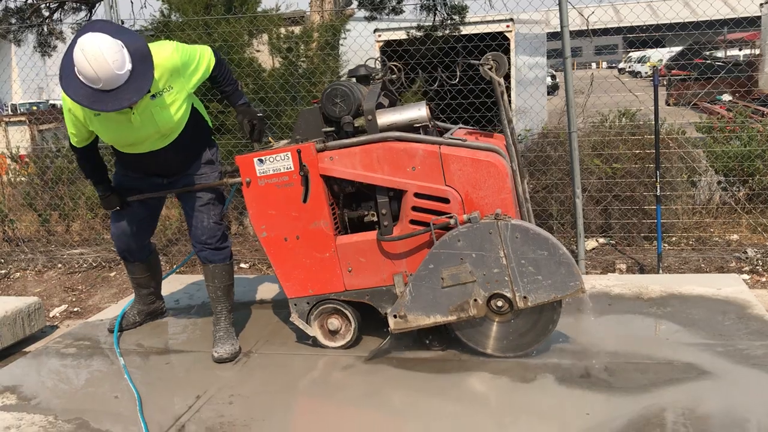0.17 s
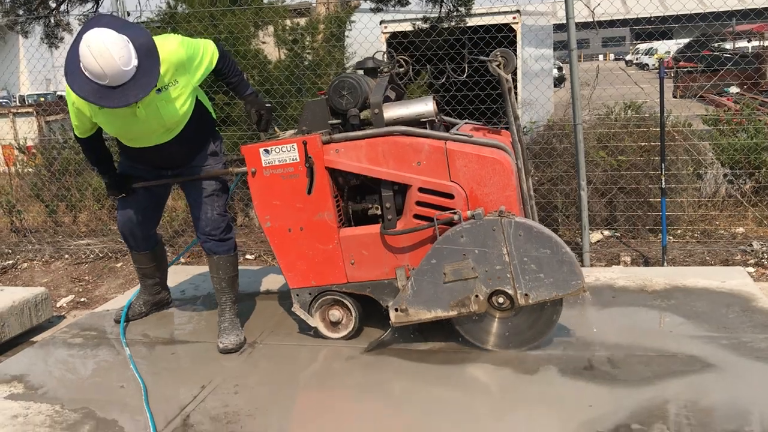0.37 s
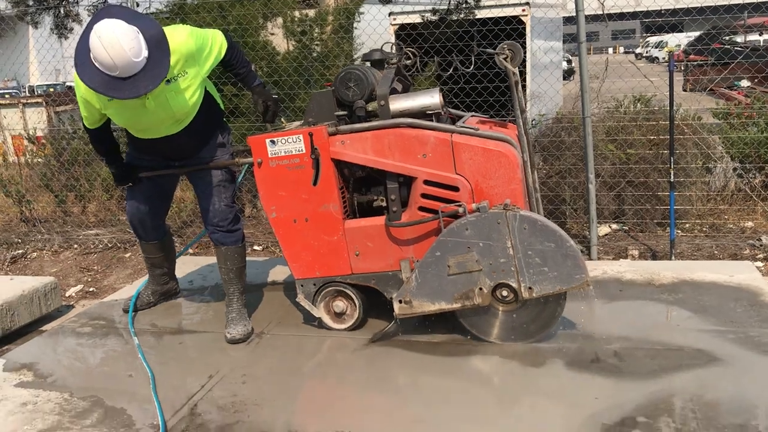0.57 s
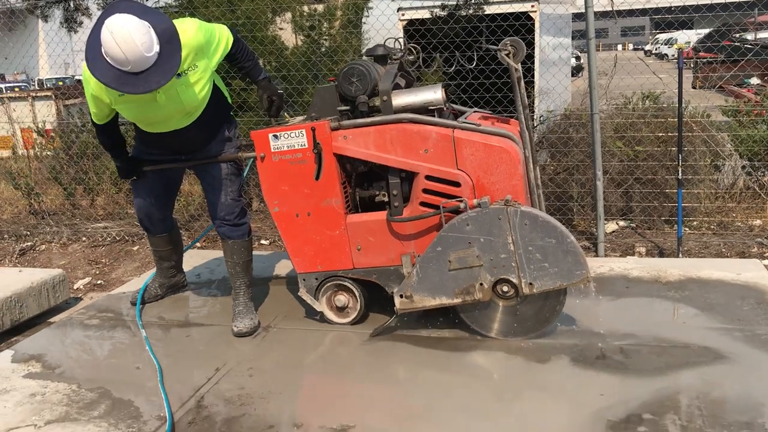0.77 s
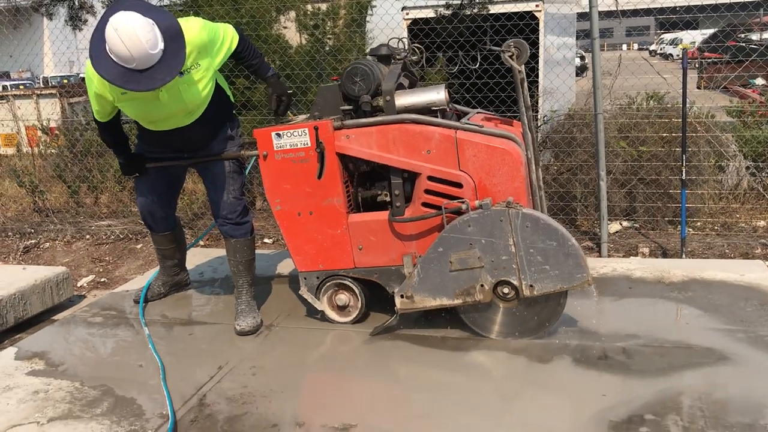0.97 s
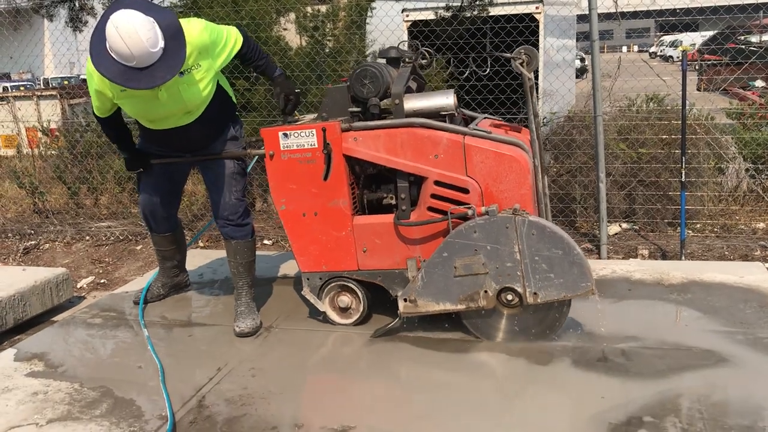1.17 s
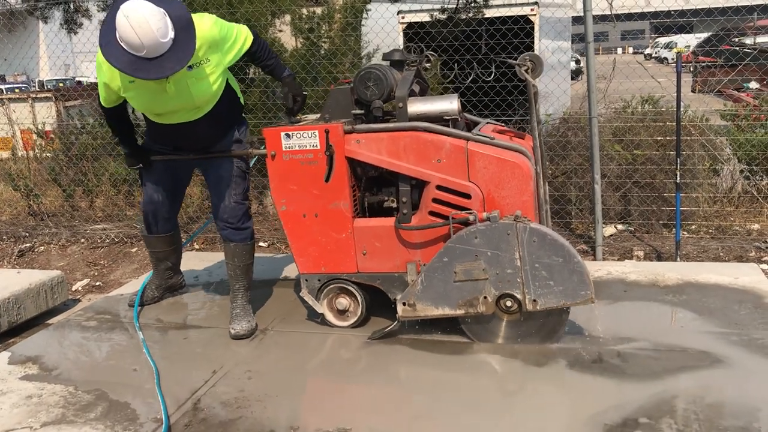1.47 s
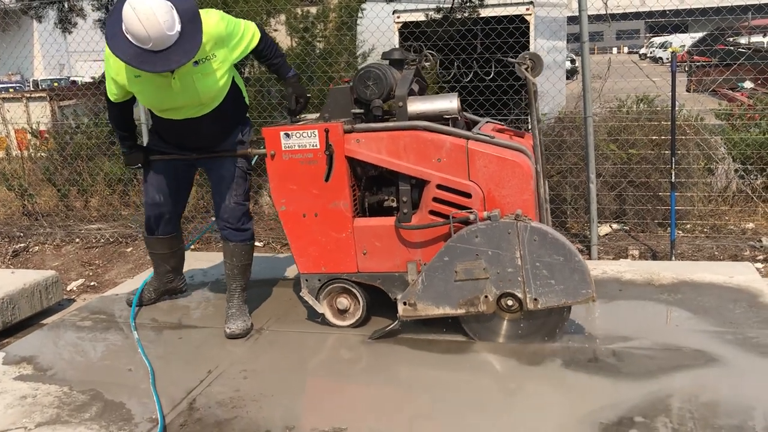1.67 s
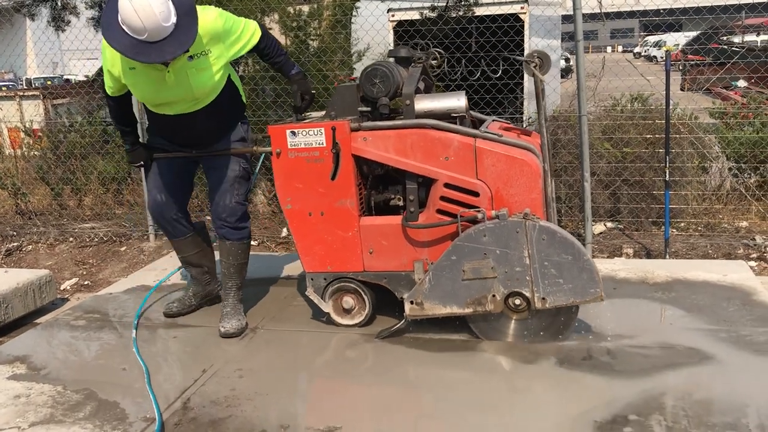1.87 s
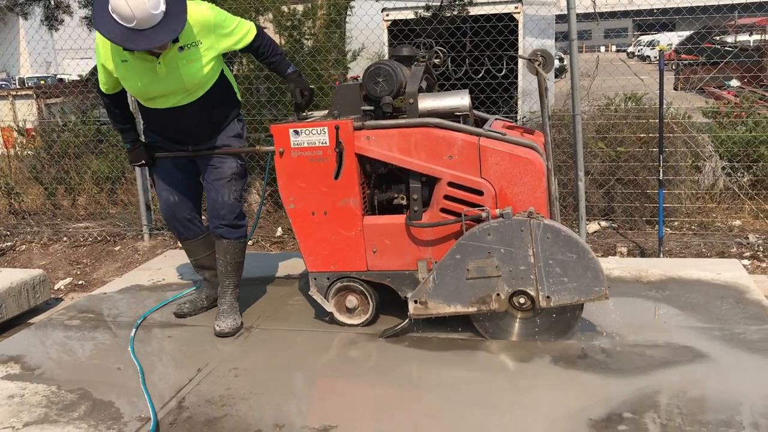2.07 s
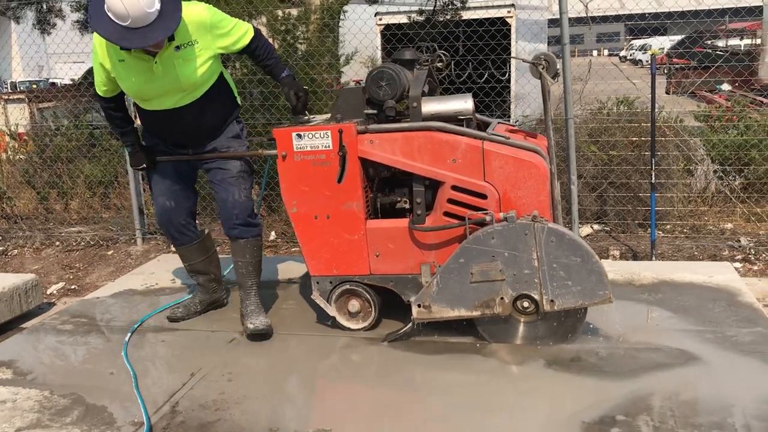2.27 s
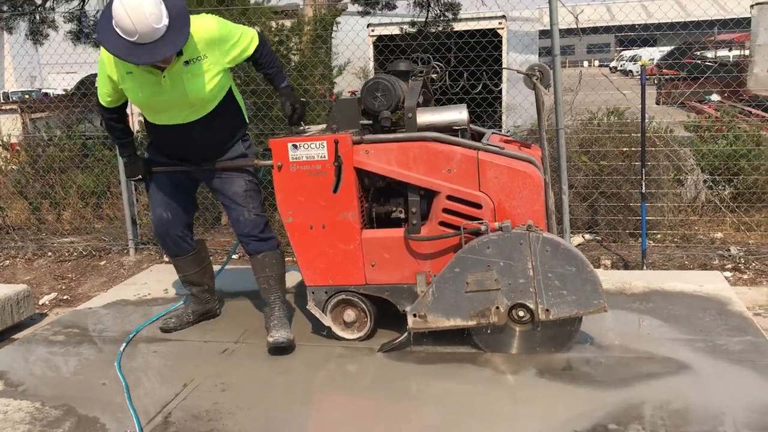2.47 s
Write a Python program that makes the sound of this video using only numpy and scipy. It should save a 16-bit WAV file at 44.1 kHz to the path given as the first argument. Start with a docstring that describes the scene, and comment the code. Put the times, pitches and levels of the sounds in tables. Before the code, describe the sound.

A walk-behind diesel concrete saw drones, then its blade bites into wet concrete with harsh ringing grind.

```python
"""Outdoors, a walk-behind diesel road saw runs at full speed while its blade cuts wet concrete.
The four-cylinder engine is a sum of sines for drone and whines, plus filtered noise for growl and clatter.
After half a second the blade bites: dense random impacts ring the steel disc, rasp and spray slurry,
and three disc modes sing as wavering tones. Hollow swells pass through the hum; the whole slowly sinks."""
import sys
import numpy as np
from scipy import signal
from scipy.fft import rfft, irfft
from scipy.io import wavfile
from scipy.ndimage import uniform_filter1d

SR = 44100
rng = np.random.default_rng(int(sys.argv[2]) if len(sys.argv) > 2 else 0)


def unload_audio(sound):
    """Save the sound as a 16-bit wav file, at the path given as the first command line argument."""
    columns = np.transpose(np.atleast_2d(sound))
    # keep every value between -1 and 1, then stretch to whole-number steps
    steps = np.round(np.clip(columns, -1, 1) * 32767)
    wavfile.write(sys.argv[1], SR, steps.astype(np.int16))


N = 115983

# The blade in the cut. Each row: time in seconds, relative grinding force in dB,
# relative level of the spray hiss in dB.
CUT_COURSE = [(.46, -20.5, -35), (.495, -9, 0), (.52, 0, 0), (.6, 1, 2.5), (.74, 0, -2.5), (.9, 0, 0),
              (1.02, 1, -1), (1.08, 3, 2), (1.15, 4, 6), (1.28, 2.5, 4), (1.35, 4, 4.5), (1.41, 1, 4),
              (1.5, 5.5, 4.5), (1.66, 2, 3), (1.82, 3.5, 3), (2.12, 3.5, 3), (2.24, 0.5, 0), (2.42, 4, 4),
              (2.63, 2.5, 0.5)]


def undb(db):
    """Level to amplitude: 20 dB is a factor of ten."""
    return 10 ** (np.asarray(db) / 20)


def unit(x):
    """Normalisation: scale to an rms value of 1."""
    return x / np.sqrt(np.mean(x ** 2))


def curve(table, axis=1):
    """Linear interpolation in time of one column of a table."""
    rows = np.array(table, float)
    return np.interp(np.arange(N) / SR, rows[:, 0], rows[:, axis])


def walk(rate):
    """Slow random modulation: values held for 1 / rate seconds, smoothed twice, rms 1."""
    hold = int(SR / rate)
    held = np.repeat(rng.standard_normal(N)[:N // hold + 1], hold)
    smoothed = uniform_filter1d(uniform_filter1d(held, hold), hold)
    return unit(smoothed[:N])


def colour(x, points):
    """Spectral shaping: a response through (Hz, dB) points on a log frequency axis, rms 1."""
    hz, db = np.array(points, float).T
    frequency = np.maximum(np.fft.rfftfreq(N, 1 / SR), 1)
    response = undb(np.interp(np.log(frequency), np.log(hz), db))
    return unit(irfft(rfft(x) * response, N))


def ring(x, hz, width):
    """Resonance: one damped mode of the given bandwidth in Hz, driven by x, rms 1."""
    pole = np.exp((2j * np.pi * hz - np.pi * width) / SR)
    return unit(signal.lfilter([1], [1, -pole], x).imag)


def tone(turns):
    """Pure tone: a sine of rms 1 from its phase in turns."""
    return np.sqrt(2) * np.sin(2 * np.pi * turns)


def grains(rate, spread_db):
    """Shot noise: random impacts per second, of either sign and unequal size, rms 1."""
    hit = rng.random(N) < rate / SR
    sign = rng.choice([-1, 1], N)
    size = undb(spread_db * rng.exponential(size=N).clip(0, 5))
    return unit(hit * sign * size)


def blade():
    """Impact excitation: grit strikes the disc's modes, rasps through the ringing guard, flies off as slurry."""
    # Modes of the steel disc. Each row: frequency in Hz, bandwidth in Hz, relative level in dB.
    disc_modes = [(2110, 70, -33), (2580, 45, -30.5), (3085, 40, -33), (3190, 40, -35), (3370, 45, -28.5),
                  (3480, 45, -32), (3715, 45, -29.5), (3830, 35, -29.5), (4100, 50, -33),
                  (4440, 110, -27.5), (4786, 35, -27.5), (5270, 70, -29.5), (5610, 25, -34),
                  (5716, 20, -36), (5992, 28, -28.5), (6285, 30, -34), (6378, 30, -34), (6575, 40, -28),
                  (7000, 25, -38), (8520, 30, -36), (8950, 40, -35), (9280, 70, -36), (10750, 50, -37),
                  (11130, 60, -36), (11630, 50, -35), (14800, 90, -35)]
    # Spectrum of the rasp. Each row: frequency in Hz, relative level in dB per Hz.
    rasp_spectrum = [(500, -31), (1000, -7.5), (1800, -24), (2300, -6), (2850, -10.5), (3150, -2.5),
                     (3800, 1), (4500, .5), (5000, -6), (5400, -2), (5800, -5.5), (6500, -6), (7100, -6),
                     (7500, -9.5), (8200, -15), (16000, -24)]
    # Spectrum of the slurry spray. Each row: frequency in Hz, relative level in dB per Hz.
    spray_spectrum = [(3000, -17), (7000, -18), (8200, -3.5), (8700, -1.5), (9400, 1.5), (10300, 0),
                      (11000, 3), (12500, 0), (14000, 3), (15000, 0.5), (16000, 3.5)]
    disc_db, rasp_db, spray_db = 0.5, -17, -19.5
    grit_per_s, grit_spread_db = 15000, 2.0
    guard_share, guard_t60_s = 0.34, 0.11  # t60: time to decay by 60 dB

    flutter = undb(0.72 * walk(59.67))  # spread in dB, changes per second
    grit = grains(grit_per_s, grit_spread_db)
    disc = sum(undb(db) * ring(grains(grit_per_s, grit_spread_db), hz, width)
               for hz, width, db in disc_modes)

    decay = np.exp(-np.log(1000) * np.arange(N) / SR / guard_t60_s)
    tail = rng.standard_normal(N) * decay
    guard = unit(signal.fftconvolve(grit, tail)[:N])

    rasp = colour(grit + guard_share * guard, rasp_spectrum)
    droplets = grains(2 * grit_per_s, grit_spread_db)
    spray = colour(droplets + guard_share * guard, spray_spectrum)

    force = undb(curve(CUT_COURSE))
    grinding = force * (undb(disc_db) * disc + undb(rasp_db) * rasp)
    hiss = undb(spray_db + curve(CUT_COURSE, axis=2)) * spray
    return flutter * (grinding + hiss)


def singing():
    """Frictional excitation: rubbing on the slot walls keeps three disc modes sounding as unsteady tones."""
    # Rubbed modes. Each row: frequency in Hz, rms pitch wander in Hz, rms level waver in dB.
    rubbed_modes = [(1034, 10, 2), (2112, 24, 3.5), (7226, 8, 3)]
    # Their course. Each row: time in seconds, then levels in dB of the lowest, middle and highest mode.
    mode_levels = [(.47, -60, -50, -55), (.5, -36, -32, -29), (.525, -32, -20, -26), (.58, -25, -28, -33),
                   (.63, -23, -23, -35), (.69, -28, -23, -30), (.74, -28, -30, -26), (.82, -28, -25, -31),
                   (.88, -28, -27, -35), (.93, -28, -24, -27), (1.06, -26, -22, -30), (1.15, -31, -25, -31),
                   (1.21, -27, -20, -31), (1.28, -34, -27, -27), (1.4, -40, -29, -34), (1.5, -35, -29, -33),
                   (1.58, -35, -19, -28), (1.64, -40, -38, -35), (1.7, -38, -23, -38),
                   (1.78, -38, -19, -26), (1.9, -33, -28, -30), (2.1, -34, -29, -30), (2.3, -42, -28, -36),
                   (2.53, -25, -27, -34), (2.63, -29, -28, -35)]

    song = 0
    for k, (hz, wander_hz, waver_db) in enumerate(rubbed_modes):
        turns = np.cumsum(hz + wander_hz * walk(70)) / SR
        wavering = unit(undb(waver_db * walk(60.1)) * tone(turns))
        song = song + undb(curve(mode_levels, axis=k + 1)) * wavering
    return song


def engine():
    """Periodic excitation: drone and whines follow the firing rate; clatter partly repeats each cycle."""
    # Exhaust drone. Each row: multiple of the firing rate, level in dB.
    drone_partials = [(1, -25), (1.5, -38), (2, -19.5), (2.5, -40), (2.75, -40.5), (3, -51.5), (3.5, -37.5),
                      (5, -41.5)]
    # Gear and fan whines. Each row: multiple of the firing rate, level in dB before waver and load.
    whine_partials = [(3.8, -39), (5.75, -41), (7.62, -41), (12.26, -37), (19.2, -39)]
    # Spectrum of the clatter. Each row: frequency in Hz, relative level in dB per Hz.
    clatter_spectrum = [(20, -32), (40, -14), (70, -13), (130, -4.5), (260, -1), (380, -1), (445, -8.5),
                        (560, -2.5), (680, -4.5), (900, -6.5), (1150, -9), (1350, -4), (1750, -8),
                        (2150, -5.5), (2500, -8.5), (2900, -11), (5000, -18.5), (9000, -20), (16000, -27)]
    # Exhaust growl, which dips and then grows as the engine labours. Each row: time in seconds, level in dB.
    growl_course = [(.5, -39), (1.4, -42.5), (2.0, -36), (2.63, -34)]
    cylinders, firing_hz, speed_waver = 4, 108, .002  # waver: rms fraction of the firing rate
    whine_waver_db, whine_drift_hz, whine_under_load_db = 3, 4.27, -2
    clatter_db, repeating_share, knock_depth = -22, 0.35, 0.17  # share of the noise power
    growl_hz, growl_width_hz = 369, 76

    firings = np.cumsum(firing_hz * (1 + speed_waver * walk(10))) / SR
    drone = sum(undb(db) * tone(k * firings + rng.random()) for k, db in drone_partials)

    whines = 0
    for multiple, db in whine_partials:
        gain = undb(db + whine_waver_db * walk(12))
        drift = np.cumsum(whine_drift_hz * walk(29.55)) / SR
        whines = whines + gain * tone(multiple * firings + drift)

    # The same stretch of noise is read again in every engine cycle.
    cycle = int(SR * cylinders / firing_hz)
    place = (firings / cylinders % 1 * cycle).astype(int)
    repeating = rng.standard_normal(N)[place]
    fresh = rng.standard_normal(N)
    noise = np.sqrt(repeating_share) * repeating + np.sqrt(1 - repeating_share) * fresh
    knocking = noise * (1 + knock_depth * np.cos(2 * np.pi * firings))
    clatter = undb(clatter_db) * colour(knocking, clatter_spectrum)

    # Two equal resonances in series make steeper skirts.
    resonant = ring(ring(knocking, growl_hz, growl_width_hz), growl_hz, growl_width_hz)
    growl = undb(curve(growl_course)) * resonant

    load = np.minimum(undb(curve(CUT_COURSE)), 1)
    return drone + growl + undb(whine_under_load_db * load) * whines + clatter


def swells():
    """Amplitude modulation: bell-shaped envelopes raise brief hollow tones in the hum."""
    # Each row: time of the peak in seconds, frequency in Hz, peak level in dB.
    swell_peaks = [(1.14, 323.4, -27.5), (1.45, 329.6, -28.5), (1.61, 369, -26)]
    swell_s = .045  # from the peak to 1/e of it

    t = np.arange(N) / SR
    hum = 0
    for peak_s, hz, db in swell_peaks:
        envelope = np.exp(-((t - peak_s) / swell_s) ** 2)
        hum = hum + undb(db) * envelope * tone(hz * t + rng.random())
    return hum


def scene():
    """Superposition: all sources add, and two equal channels place them straight ahead."""
    # Level of the whole sound. Each row: time in seconds, level in dB.
    overall_level = [(0.06, 0), (.5, -0.5), (.9, -3), (1.3, -4.5), (1.7, -6.5), (2.2, -6.5), (2.63, -8.5)]
    saw = (engine() + swells() + blade() + singing()) * undb(curve(overall_level))
    return np.array([saw, saw])


def record(dry):
    """Saturation and band limiting: peaks are rounded, the sound cuts in with a gap, the top is cut off."""
    # Silence, onset and one short gap. Each row: time in seconds, gain as a plain factor.
    onset_gain = [(.059, 0), (.061, 1), (.068, 1), (.074, 0), (.083, 0), (.0845, 1)]
    peak_ceiling, top_hz = .95, 15720

    rounded = dry / (1 + (dry / peak_ceiling) ** 4) ** .25
    low_pass = signal.ellip(12, .2, 80, top_hz, fs=SR, output="sos")  # ripple and stop-band depth in dB
    return signal.sosfilt(low_pass, rounded * curve(onset_gain))


dry = scene()
out = record(dry)
unload_audio(out)
```